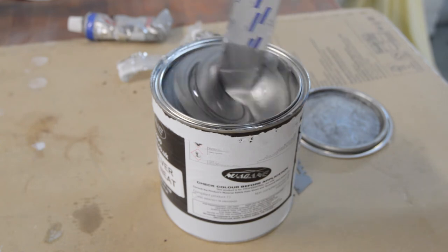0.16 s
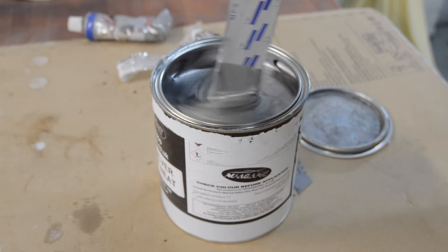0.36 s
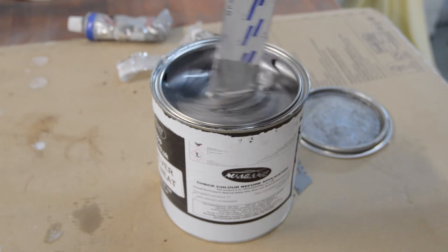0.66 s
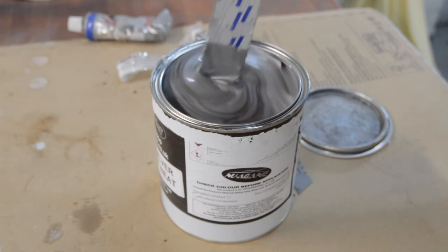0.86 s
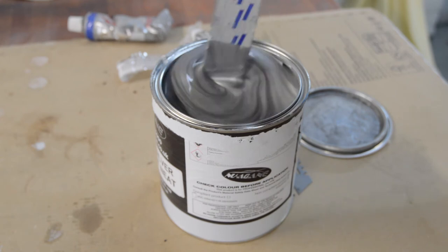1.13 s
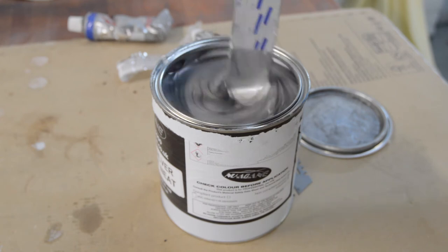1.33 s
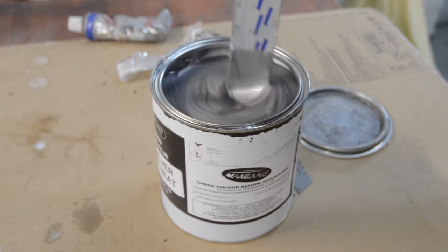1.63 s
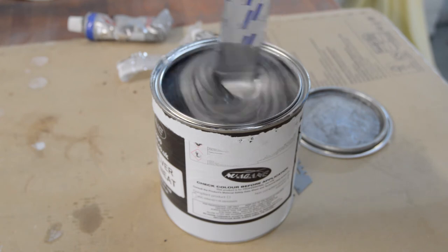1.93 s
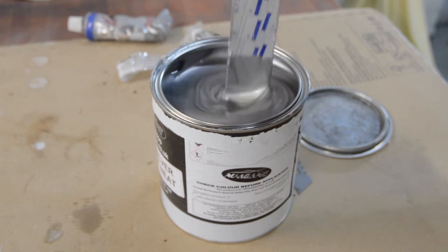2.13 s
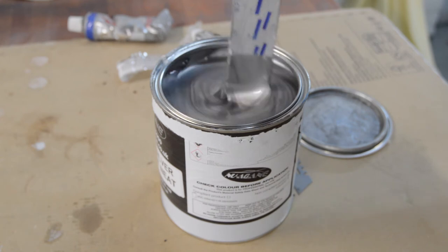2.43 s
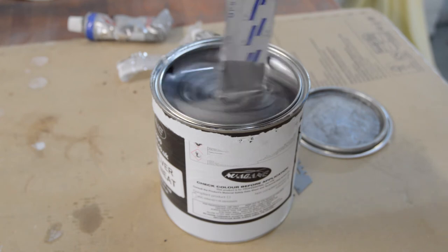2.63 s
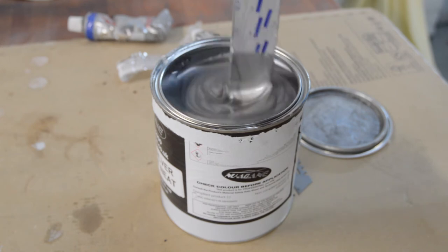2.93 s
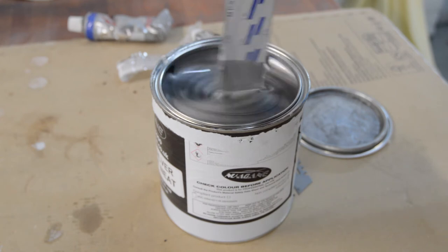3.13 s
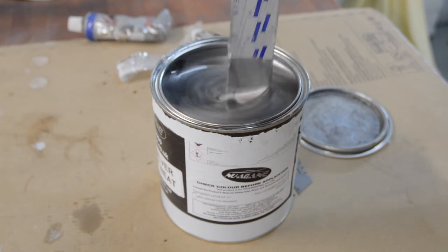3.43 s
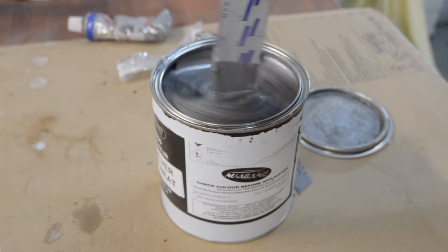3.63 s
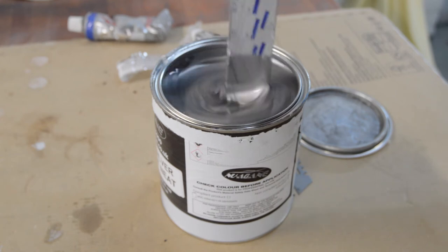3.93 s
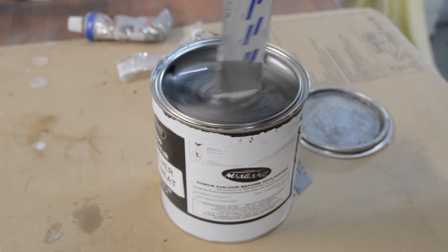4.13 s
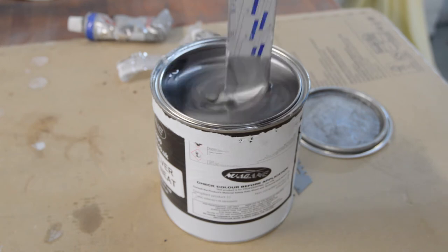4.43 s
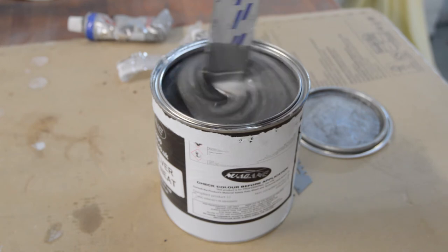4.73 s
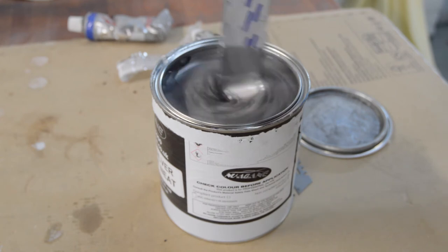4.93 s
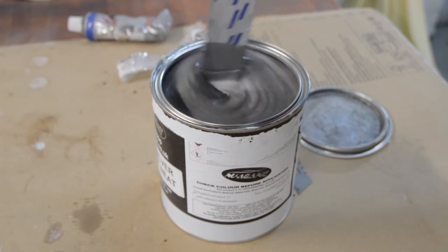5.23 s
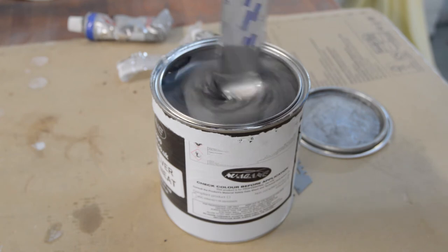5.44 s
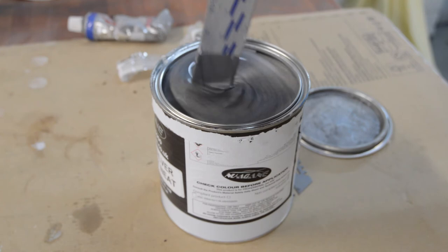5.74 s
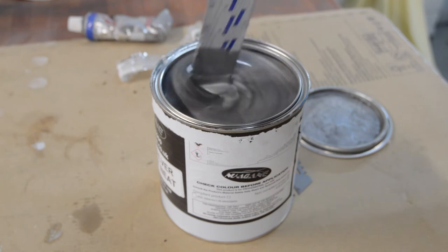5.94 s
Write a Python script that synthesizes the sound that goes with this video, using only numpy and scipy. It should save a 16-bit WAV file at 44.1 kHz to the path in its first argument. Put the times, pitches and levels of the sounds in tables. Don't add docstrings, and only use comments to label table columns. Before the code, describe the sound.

Close gritty metallic scraping of a stick stirring thick paint in a tin, rhythmic to-and-fro strokes over faint workshop hum, finishing with harder thumps.

```python
import sys
import numpy as np
from scipy import signal
from scipy.fft import rfft, irfft
from scipy.io import wavfile
from scipy.ndimage import uniform_filter1d

SR = 44100
rng = np.random.default_rng(int(sys.argv[2]) if len(sys.argv) > 2 else 0)


def transcribe(signal):
    frames = np.atleast_2d(signal).T
    limited = np.clip(frames, -1, 1)
    pcm = np.round(limited * 32767).astype(np.int16)
    wavfile.write(sys.argv[1], SR, pcm)


def amplitude_ratio(level_db):
    exponent = np.asarray(level_db, float) / 20
    return 10 ** exponent


N = 268128
T = np.arange(N) / SR


def unit(x):
    return x / np.sqrt(np.mean(x ** 2) + 1e-20)


def curve(rows):
    return np.interp(T, [r[0] for r in rows], [r[1] for r in rows])


def wobble(rate_hz):
    knots = rng.standard_normal(int(N * rate_hz / SR) + 2)
    return np.interp(T * rate_hz, np.arange(len(knots)), knots)


def resonate(x, hz, width_hz):
    return signal.lfilter(*signal.iirpeak(hz, hz / width_hz, SR), x)


def ring_twice(x, hz, width_hz):
    wide_hz = 1.82 * width_hz
    return resonate(resonate(x, hz, wide_hz), hz, wide_hz)


def grit(spread_db, fleck_db):
    slip_db = spread_db * np.minimum(rng.exponential(1, N), 4.2)
    clump_db = 2.4 * wobble(300) + 0.72 * wobble(60)
    slips = amplitude_ratio(slip_db + clump_db) * rng.standard_normal(N)
    z = signal.stft(slips, nperseg=512)[2]
    flecks = unit(uniform_filter1d(rng.standard_normal(z.shape), size=4, axis=1))
    return unit(signal.istft(z * amplitude_ratio(fleck_db * flecks), nperseg=512)[1][:N])


def rubbed(modes, force, wander_db, wander_hz, fleck_db, lean_db=0):
    drive = force * grit(spread_db=2.5, fleck_db=fleck_db)
    hz, width_hz, db = np.transpose(modes)
    wander = np.array([wobble(wander_hz) for _ in modes])
    feed = amplitude_ratio(db[:, None] + lean_db + wander_db * wander)
    feed /= np.sqrt(width_hz @ feed ** 2 * 2.99 / SR)
    out = np.zeros(N)
    for k in range(len(modes)):
        out += (-1) ** k * ring_twice(drive * feed[k], hz[k], width_hz[k])
    return out


# (full contact [s], drag [s], first level [dB], last level [dB], bend of the blade [dB])
PUSHES = [(0.086, 0.098, -29.0, -26.5, -53.5), (0.48, 0.068, -27.5, -30.5, -53),
          (0.688, 0.041, -31.5, -32.5, -43.5), (0.961, 0.054, -30, -28.5, -48.9),
          (1.268, 0.039, -27.5, -28.5, -43), (1.545, 0.048, -29.0, -29, -46), (1.797, 0.067, -45, -28, -48),
          (2.072, 0.06, -31, -31, -44.5), (2.34, 0.048, -35.5, -30.5, -42), (2.601, 0.058, -40, -27.5, -42),
          (2.865, 0.059, -32.5, -29.0, -45.5), (3.123, 0.059, -32.5, -27, -44.5),
          (3.371, 0.053, -36, -24.5, -41.5), (3.631, 0.042, -28.5, -29.0, -40),
          (3.872, 0.055, -34.5, -29.5, -42.5), (4.122, 0.053, -29, -30, -38),
          (4.372, 0.055, -31.5, -26, -36.5), (4.621, 0.052, -27, -31.5, -37.5),
          (4.854, 0.054, -32.0, -25.5, -36.5), (5.093, 0.052, -28, -26.5, -37),
          (5.335, 0.054, -25, -27, -37), (5.57, 0.06, -27, -26.5, -36.5), (5.789, 0.066, -29, -25, -38),
          (5.999, 0.074, -33.5, -24, -34.0)]
# (full contact [s], drag [s], first level [dB], last level [dB], edge bite [dB])
RETURNS = [(0.0, 0.012, -35.5, -45, -3.5), (0.321, 0.073, -42.5, -39, 3), (0.813, 0.049, -23.5, -34, 0),
           (1.098, 0.049, -29, -29, -1.5), (1.397, 0.039, -31, -29, 0), (1.661, 0.055, -37.5, -29.0, -0.5),
           (1.941, 0.045, -32.5, -25, 2), (2.223, 0.031, -29.5, -27.5, 2.5),
           (2.489, 0.037, -30, -26.5, 1.5), (2.733, 0.048, -33, -28.5, 2.5),
           (2.995, 0.052, -31.5, -29.5, 2.5), (3.257, 0.041, -30, -28.5, 2),
           (3.515, 0.031, -29.0, -30, 3.0), (3.76, 0.035, -30.5, -28.5, 4.5), (4.008, 0.031, -31, -29.5, 3),
           (4.259, 0.03, -29, -26.5, 2.5), (4.456, 0.062, -43, -26.5, -1), (4.743, 0.029, -30.5, -26.5, 1),
           (4.956, 0.055, -34.5, -25.5, -1), (5.2, 0.038, -36.5, -26.5, 1), (5.449, 0.026, -31, -28.5, 1.5),
           (5.659, 0.05, -39, -23.5, -3), (5.893, 0.0423, -33, -20, -6)]
SLAM_FROM_S = 5.75


def sweep_force():
    slam_db_per_s = 25000
    stop_from_s, stop_s = 4.2, 0.0031
    stop_max_db, stop_db_per_s = 13.5, 429
    arch_db = 0.34
    creep_until_s, creep_below_db, creep_db_per_s = 2.2, 11, 260
    level_db = np.full(N, -120.)
    for rows, down_db_per_s, up_db_per_s in (PUSHES, 689, 685), (RETURNS, 436, 700):
        for s, drag_s, first_db, last_db, _ in rows:
            slams = s > SLAM_FROM_S and rows is PUSHES
            rise_db = slam_db_per_s if slams else down_db_per_s
            drop_db, fall_db = up_db_per_s * stop_s, up_db_per_s
            if s > stop_from_s and rows is RETURNS:
                drop_db, fall_db = stop_max_db, stop_db_per_s
            times = s + np.cumsum([-1, 1, drag_s / 2, drag_s / 2, stop_s, 1])
            middle_db = (first_db + last_db) / 2 + arch_db
            stopped_db = last_db - drop_db
            shape_db = [first_db - rise_db, first_db, middle_db, last_db, stopped_db, stopped_db - fall_db]
            level_db = np.maximum(level_db, np.interp(T, times, shape_db))
            if s < creep_until_s:
                creep_db = first_db - creep_below_db - creep_db_per_s * (s - T)
                level_db = np.maximum(level_db, np.where(T < s, creep_db, -120))
    return amplitude_ratio(level_db)


# (bottom early, bottom late, edge early, edge late, rim, tip [all dB])
PUSH_SPOT = (-0.5, -2, -1.5, -9, -0.5, -19.5)
RETURN_SPOT = (-2, -8, -6.5, -5, 2, -29.5)
# (time [s], level [dB])
CENTRE_PASS = [(0, -6.5), (1, -2), (2, 1.5), (3, 4.5), (4, 1), (5, 1.5), (6, -3)]
# (time [s], level [dB])
EDGE_TILT = [(.1, 3), (.5, -5.5), (1, -1), (1.8, -5), (2.3, -1), (3.4, 2), (4.5, 3.5), (5.5, 2), (6, 0.5)]


def spots():
    bend_mid_db, rim_per_bend, tip_per_bend = -41, -0.18, 0.3
    tilt_late, tilt_tip = 0.26, 0.62
    bottom_per_bite, bite_early, bite_late = 0.1, 2.8, 0.46
    centre_late = 0.15
    rows = []
    for s, drag_s, _, _, bend_db in PUSHES:
        press = bend_db - bend_mid_db
        tilt = np.interp(s, *np.transpose(EDGE_TILT))
        tip_db = tip_per_bend * press + tilt_tip * tilt
        change_db = np.array([0, 0, tilt, tilt_late * tilt, rim_per_bend * press, tip_db])
        rows.append([s, s + drag_s, *(PUSH_SPOT + change_db)])
    for s, drag_s, _, _, bite_db in RETURNS:
        change_db = bite_db * np.array([0, bottom_per_bite, bite_early, bite_late, 0, 0])
        rows.append([s, s + drag_s, *(RETURN_SPOT + change_db)])
    start, end, low_early, low_late, high_early, high_late, rim, tip = np.transpose(sorted(rows))
    middle = np.interp(start, *np.transpose(CENTRE_PASS))
    times = np.ravel([start, (start + end) / 2, end], "F")

    def travel(early_db, late_db, arch_db):
        shape_db = np.ravel([early_db, (early_db + late_db) / 2 + arch_db, late_db], "F")
        return amplitude_ratio(np.interp(T, times, shape_db))

    bottom = travel(low_early + middle, low_late + centre_late * middle, 0)
    return bottom, travel(high_early, high_late, 3), travel(rim, rim, 0), travel(tip, tip, 3.5)


# (frequency [Hz], width [Hz], level [dB])
BOTTOM_MODES = [(1744, 215, -8.5), (1821, 56, 5), (1970, 111, 1), (2169, 54, 2), (2266, 74, -3.5),
                (2506, 120, -11)]
# (frequency [Hz], width [Hz], level [dB])
WALL_MODES = [(2906, 300, -4.5), (3340, 300, -3.5), (3625, 115, 2.5), (3940, 197, 1.5), (4260, 123, -2.5)]
# (frequency [Hz], width [Hz], level [dB])
RIM_MODES = [(4492, 180, -1.5), (4770, 154, -3), (5050, 150, 2.5), (5396, 217, -4), (5826, 143, -6)]
# (frequency [Hz], width [Hz], level [dB])
EDGE_MODES = [(6215, 370, -7), (6850, 143, -3), (7484, 254, -1.5), (7920, 215, -4), (8110, 153, -0.5),
              (8700, 430, -5), (9520, 246, -2), (10280, 440, -9), (11140, 440, -8.5), (11600, 280, -16.5),
              (11860, 290, -14)]
# (frequency [Hz], width [Hz], level [dB])
TIP_MODES = [(13220, 270, 3), (13450, 250, -1), (14200, 300, -6), (14800, 180, -10)]


def scrape():
    light_db, light_share = -32.5, 0.19
    force = sweep_force()
    bottom, edge, rim, dig = spots()
    bottom = bottom * np.clip(amplitude_ratio(light_db) / force, 1, 30) ** light_share
    tin = force / np.sqrt(1 + bottom ** 2 + edge ** 2)
    wall = tin / np.sqrt(1 + rim ** 2)
    fizz = tin * edge * np.minimum(force / amplitude_ratio(-25), 1) ** 0.31
    return (rubbed(BOTTOM_MODES, tin * bottom, wander_db=4.5, wander_hz=40, fleck_db=3.5)
            + rubbed(WALL_MODES, wall, wander_db=5.5, wander_hz=45, fleck_db=4.5)
            + rubbed(RIM_MODES, wall * rim, wander_db=7.5, wander_hz=44, fleck_db=4.5)
            + rubbed(EDGE_MODES, fizz, wander_db=4, wander_hz=47, fleck_db=6)
            + rubbed(TIP_MODES, fizz * dig, wander_db=0, wander_hz=51, fleck_db=8))


# (time [s], peak level [dB], frequency [Hz])
EDGE_CATCHES = [(0.0777, -22, 3840), (0.5122, -16.5, 4630), (0.7851, -19, 3890), (0.821, -19.5, 3800),
                (1.0839, -35, 4970), (1.268, -25, 5050), (1.5319, -23.5, 4900), (1.8452, -18, 5050),
                (1.93, -25.5, 5100), (2.714, -32, 1852), (3.116, -31, 1820), (3.6257, -23, 1870),
                (3.7564, -22.5, 4760), (4.2562, -19, 5090), (4.3675, -26, 8700), (4.601, -33, 1890),
                (5.3193, -28, 2130), (5.5638, -33, 4400), (5.683, -24, 5000), (5.7897, -22, 1804),
                (5.8915, -35, 4700), (5.9234, -15, 5150), (5.9993, -28, 1830), (6.0362, -22, 4970)]


def catches():
    t60_s, rise_s = 0.046, 0.00074
    out, t = np.zeros(N + SR), T[:SR // 40]
    for s, db, hz in EDGE_CATCHES:
        neighbour_hz = hz * rng.uniform(1, 1.3)
        ring = np.sin(2 * np.pi * hz * t) + 0.43 * np.sin(2 * np.pi * neighbour_hz * t)
        decay = amplitude_ratio(db - 2.5 - 60 * t / t60_s)
        out[round(s * SR):][:len(t)] += decay * (1 - np.exp(-t / rise_s)) * ring
    return out[:N]


# (time [s], level [dB])
BLADE_REST = [
    (0, -54.5),
    (3, -57),
    (6, -92),
]
DEEP_HZ = 790


def bend():
    risen_hz, trail_hz = 1140, 950
    peak_s, unbend_s, trail_s, fade_s = 0.008, 0.022, 0.032, 0.022
    loose_db, sag_db, unbent_db, trail_db = -21, -3, -9, -9.5
    rub_db = -27.5
    level_db, knots = curve(BLADE_REST), []
    for s, drag_s, _, _, db in PUSHES:
        lead_s = 0.004 if s > SLAM_FROM_S else 0.049
        times = s + np.cumsum([-lead_s, lead_s + peak_s, drag_s - peak_s, unbend_s, trail_s, fade_s])
        shape_db = db + np.array([loose_db, 0, sag_db, unbent_db, trail_db, loose_db])
        level_db = np.maximum(level_db, np.interp(T, times, shape_db, -120, -120))
        knots += [(times[0], DEEP_HZ), (s, DEEP_HZ), (times[2], risen_hz), (times[4], trail_hz)]
    return np.hypot(amplitude_ratio(level_db), amplitude_ratio(rub_db) * sweep_force()), curve(knots)


# (time [s], peak level [dB])
WALL_KNOCKS = [
    (0.63, -27.5),
    (3.375, -28.5),
    (4.097, -27.5),
    (4.83, -41),
    (5.079, -25.5),
    (5.317, -29.5),
    (5.55, -23),
    (5.79, -28),
    (6.001, -24.5),
]
# (frequency [Hz], width [Hz], level [dB])
STICK_MODES = [(598, 220, -9), (685, 98, -5), (813.7, 63, 2), (1030, 82, 1), (1212, 100, -3.5),
               (1336, 190, -2.5)]


def stick():
    blows = np.zeros(N)
    for s, db in WALL_KNOCKS:
        blows[round(s * SR):][:44] += amplitude_ratio(db + 13) * np.hanning(44)
    upper_hz, upper_width_hz = STICK_MODES[3][:2]
    knock = amplitude_ratio(6) * ring_twice(blows, DEEP_HZ, 40.5) + amplitude_ratio(-7) * ring_twice(blows, upper_hz, upper_width_hz)
    pressure, pitch_hz = bend()
    octaves_off = np.log2(np.transpose(STICK_MODES)[0][:, None] / pitch_hz)
    lean_db = -14 * np.abs(octaves_off)
    return rubbed(STICK_MODES, pressure, wander_db=4, wander_hz=30, fleck_db=2.5, lean_db=lean_db) + knock


# (time [s], level [dB])
BENCH_ROCKS = [
    (5.787, -30),
    (5.993, -32.5),
]
# (frequency [Hz], width [Hz], level [dB])
BENCH_MODES = [(85, 50, -31), (134, 63, -16.5), (250, 40, -9), (278, 33, 3), (336, 47, -15),
               (490, 180, -15)]


def bench():
    rise_s, hold_s, stop_s = 0.021, 0.045, 0.04
    steps = np.cumsum([0, rise_s, hold_s, stop_s])
    shake = np.zeros(N)
    for s, db in BENCH_ROCKS:
        rocking = (T > s) * (T < s + steps[-1])
        shake += rocking * amplitude_ratio(db + np.interp(T - s, steps, [-7.5, 0, -11, -41]))
    return rubbed(BENCH_MODES, shake, wander_db=3, wander_hz=30, fleck_db=-0.5)


def room(x, t60_s):
    t = T[:SR // 3]
    mid, side = rng.standard_normal((2, len(t))) * amplitude_ratio(-60 * t / t60_s)
    tail = (mid + amplitude_ratio(-12) * np.outer([1, -1], side)) / np.linalg.norm(mid)
    return signal.fftconvolve(np.pad(x, (200, 0))[None], tail, axes=1)[:, :N]


# (frequency [Hz], density [dB per Hz])
AIR_COLOUR = [(20, -34), (50, -21.5), (120, -11.5), (230, -7.5), (275, 1.5), (330, -7.5), (600, -9),
              (820, -5.5), (1400, -18), (2500, -11.5), (5000, -12), (8000, -16.5), (15000, -32),
              (15800, -34)]
# (frequency [Hz], rms level [dB])
MAINS = [
    (60, -83.5),
    (120, -76),
    (180, -76.5),
]


def workshop():
    hz, db = np.transpose(AIR_COLOUR)
    colour = amplitude_ratio(np.interp(np.log(np.fft.rfftfreq(N, 1 / SR) + 1), np.log(hz), db))
    mid, side = irfft(rfft(rng.standard_normal((2, N))) * colour, N)
    air = amplitude_ratio(-53.5 + 1.67 * wobble(6)) * unit(mid + amplitude_ratio(-22.5) * np.outer([1, -1], side))
    for hum_hz, hum_db in MAINS:
        air = air + np.sqrt(2) * amplitude_ratio(hum_db + 2.8 * wobble(4.45)) * np.sin(2 * np.pi * hum_hz * T)
    return air


def scene():
    near = scrape() + catches() + stick() + bench()
    step = 1 / (0.12 * SR)
    loudness = signal.lfilter([step], [1, step - 1], near ** 2)
    return near + amplitude_ratio(-23) * room(near, t60_s=0.09) + workshop() / np.sqrt(1 + loudness / amplitude_ratio(-48.5))


def roll_off(x):
    return signal.sosfilt(signal.butter(12, 15720, fs=SR, output="sos"), x)


def record(dry):
    top_hz = 15720
    limited = irfft(rfft(dry) * (np.fft.rfftfreq(N, 1 / SR) < top_hz), N)
    return roll_off(limited)


dry = scene()
out = record(dry)
transcribe(out)
```